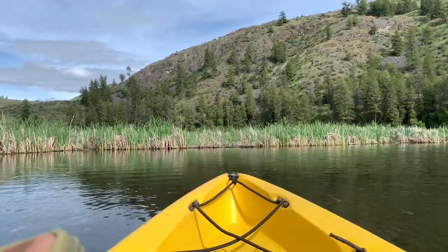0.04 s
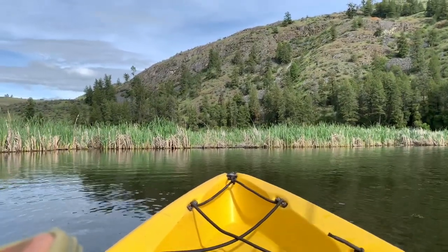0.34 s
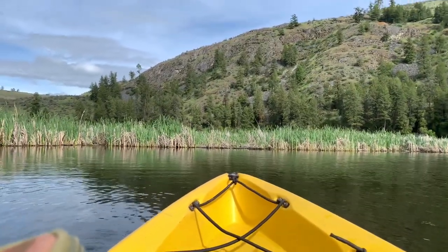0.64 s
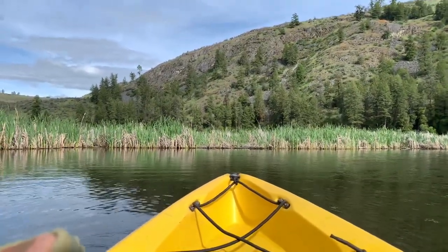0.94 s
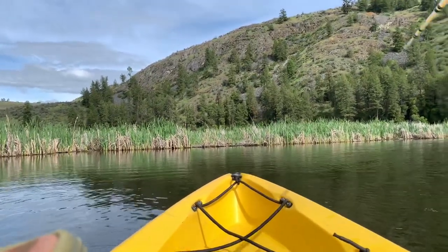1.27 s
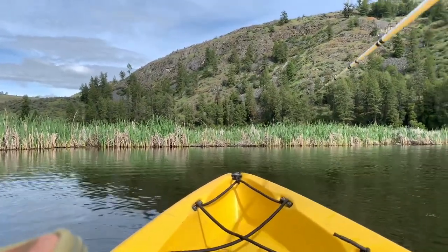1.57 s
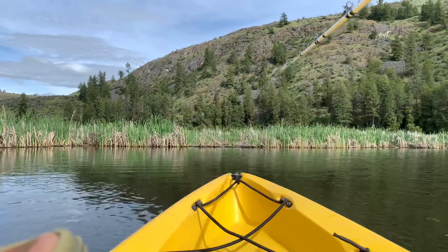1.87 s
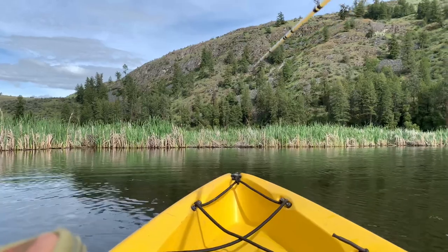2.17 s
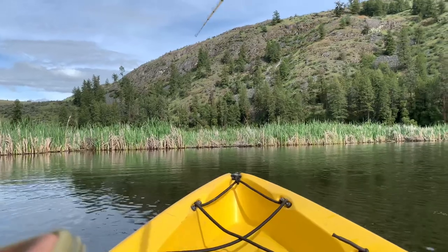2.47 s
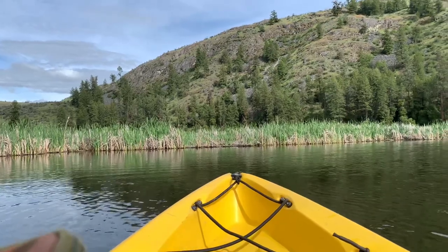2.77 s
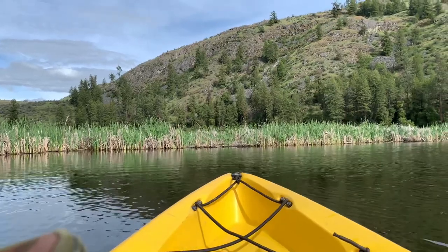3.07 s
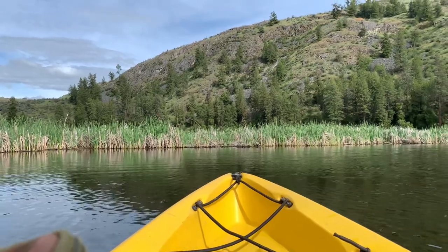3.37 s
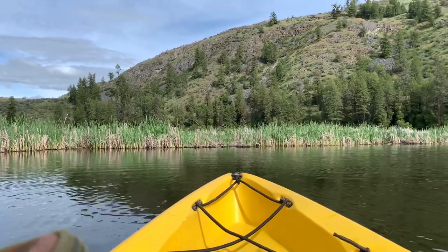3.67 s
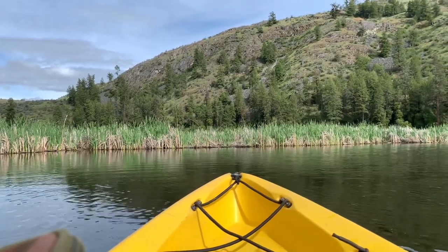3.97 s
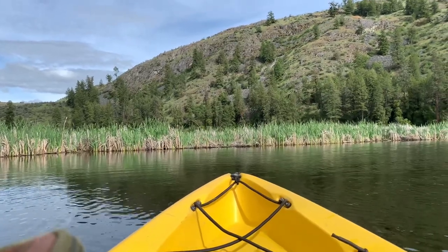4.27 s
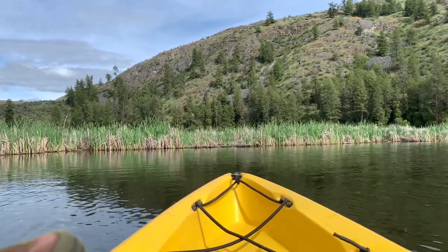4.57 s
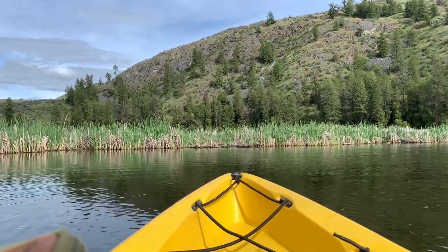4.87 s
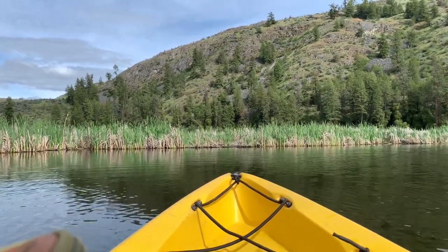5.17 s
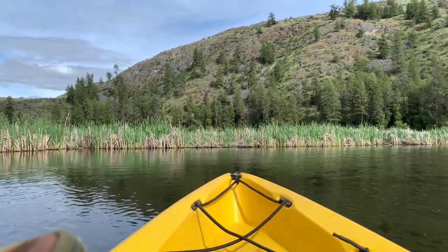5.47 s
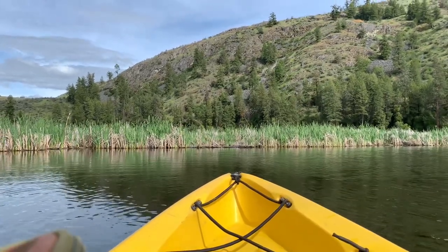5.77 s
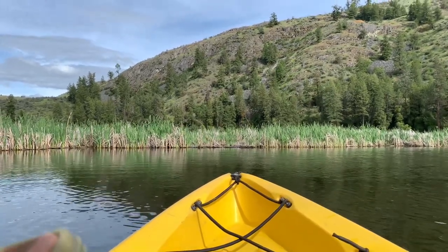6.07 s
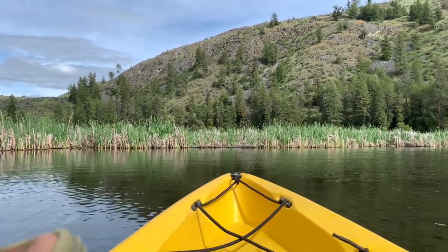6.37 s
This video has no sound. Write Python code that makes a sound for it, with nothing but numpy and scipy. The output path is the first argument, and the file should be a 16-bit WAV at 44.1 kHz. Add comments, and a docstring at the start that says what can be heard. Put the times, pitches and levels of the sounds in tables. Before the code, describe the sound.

Right at the start, a spinning reel's bail snaps open close by with a sharp metallic click. A sleeve rustles softly. At about 1 second, fishing line hisses off the spool, bright and fluttering, with a faint hum that sinks as it slows and thin high whistles from the rod rings. It stops just after 2 seconds. A few light taps follow, and at 2.8 seconds the bail snaps shut with another sharp click. The lake is then quiet, with faint high twittering and an occasional tiny plop by the kayak's hull. From about 4.7 seconds the birds grow busier, with raspy calls around 5.4, a blackbird's short buzzing trill from 5.5 to 6, and faint lower calls after it. Light wind rumbles unevenly on the microphone throughout, swelling around 2 seconds and again between 5 and 6.

```python
"""On a quiet lake, an angler casts from a kayak. The bail of a spinning reel snaps open, its impacts
ringing the reel's modes; line hisses off the spool by friction, in ever slower coils; the bail snaps shut.
Air pockets plop by the hull, small birds twitter and a blackbird sings a buzzing trill. A sleeve rustles,
and the turbulence of light gusts rumbles on the microphone."""
import sys
import numpy as np
from scipy import signal
from scipy.fft import rfft, irfft, next_fast_len
from scipy.io import wavfile
from scipy.ndimage import uniform_filter1d, map_coordinates

SR = 44100
rng = np.random.default_rng(int(sys.argv[2]) if len(sys.argv) > 2 else 0)


def dump(signal):
    """Clip the signal to [-1, 1] and save it as 16-bit WAV at the path in sys.argv[1]."""
    limited = np.clip(np.atleast_2d(signal).T, -1, 1)
    pcm = np.round(limited * 32767).astype(np.int16)
    wavfile.write(sys.argv[1], SR, pcm)


N = 284004
T = np.arange(N) / SR

# friction of the running line: time_s, level_db
PAYOUT_LEVEL = [(0.96, -67.5), (1.058, -43), (1.088, -46), (1.656, -47.5), (1.978, -59.5), (1.998, -55),
                (2.064, -67), (2.1, -66), (2.14, -54)]
LINE_STOP_S, LINE_BRAKING_S = 2.14, 0.035
def payout():
    """Friction needs motion: the line's gain lasts from the release until the lure lands."""
    level_db, = curves(PAYOUT_LEVEL)
    braking = np.clip((LINE_STOP_S - T) / LINE_BRAKING_S, 0, 1) ** 2
    return during(PAYOUT_LEVEL) * amp(level_db) * braking


# coils leaving the spool: time_s, rate_hz
COIL_RATE = [(1, 330), (1.22, 275), (1.36, 229), (1.44, 199), (1.53, 172), (1.57, 140), (1.63, 155),
             (1.76, 115), (1.9, 98)]
# line rubbing the spool lip: frequency_hz, gain_db
HISS_SPECTRUM = [(400, -14.5), (700, -12), (1200, -4), (1750, 3), (2700, 1.5), (3400, -3), (4200, -6.5),
                 (5100, 3.5), (6300, -2.5), (7700, -1), (9000, -11.5), (10500, -38), (12000, 1.5),
                 (15500, -22)]
# slack line slapping the rod: frequency_hz, gain_db
FLUTTER_SPECTRUM = [(120, 4), (250, -5), (360, -8), (550, 3), (800, -1.5), (1300, 6), (1900, -12)]
# left-right likeness of hiss and flutter: frequency_hz, correlation
LINE_CORRELATION = [(250, 1), (700, -0.096), (1700, -0.82), (2300, 0.38), (2900, 0.83), (3500, -0.24),
                    (4100, -0.67), (5000, 0.66), (6000, 0.51), (7600, 0.37), (8400, -0.23)]
# partials of the coil rate: harmonic, gain_db
HUM_HARMONICS = [(1, 6.5), (2, -15.5), (3, -28), (4, -2.5), (6, -10.5), (8, -5), (12, -1.5)]
# how the rod transmits the hum: frequency_hz, gain_db
ROD_RESPONSE = [(110, -41), (260, -17.5), (340, -26), (430, 7.5), (600, 5), (900, -4.5), (1150, -12.5),
                (1400, 6.5), (1650, -30), (2300, -12), (3500, 0)]
# swells of the hum: peak_s, half_width_s, gain_db
HUM_SWELLS = [(1.22, 0.092, -45.5), (1.375, 0.07, -45.5), (1.6, 0.1, -49), (1.8, 0.046, -65.5)]
FLUTTER_DB, FLUTTER_FADE_DB_PER_S = -2, 29
def line():
    """Periodic friction: each coil brushes the spool lip, so hiss pulses and hum sinks with the rate."""
    coil_hz, = curves(COIL_RATE)
    phase = turns(coil_hz * (1 + .015 * wobble(130)))
    brush = unit(amp(2 * np.cos(phase) + 1.3 * wobble(700) + wobble(70)))
    hiss = amp(1.5) * noise(HISS_SPECTRUM, LINE_CORRELATION)
    # comb filtering: each coil partly repeats the last, drawing falling streaks through the hiss
    hiss = hiss + .4 * np.array([np.interp(T - 1 / coil_hz, T, side) for side in hiss])
    flutter_db = FLUTTER_DB - FLUTTER_FADE_DB_PER_S * np.abs(T - COIL_RATE[0][0])  # the line straightens
    flutter = amp(flutter_db) * noise(FLUTTER_SPECTRUM, LINE_CORRELATION) * pan(-2.5)
    hum = 0
    for harmonic, db in HUM_HARMONICS:
        hz = harmonic * coil_hz
        spread = np.minimum(hz / 600, 1) * np.array([[0], [1.6]])  # low partials are more nearly in step
        waver_db = 2.5 * wobble(30)
        hum = hum + amp(db + along(ROD_RESPONSE, hz) + waver_db) * np.sin(harmonic * phase + spread)
    friction = payout() * brush * amp(0.97 * wobble(35.09)) * (hiss + flutter)
    return friction + swells(HUM_SWELLS) * amp(-6.5) * hum * pan(-8.5)


# line singing over the rings: start_s, length_s, first_hz, last_hz, level_db
RING_TONES = [(1.296, 0.15, 7900, 7600, -48), (1.412, 0.1, 7620, 7400, -40.5),
              (1.624, 0.083, 7450, 7300, -46.5), (1.86, 0.11, 14500, 12350, -53),
              (1.924, 0.065, 11000, 9530, -43), (1.973, 0.15, 10200, 9840, -49)]
# slack line dragging at release and landing: start_s, length_s, level_db
SLACK_DRAGS = [(.96, .19, -70), (1.852, 0.262, -56.5)]
def guides():
    """Sliding friction on the rod's rings gives a bright hiss and thin, narrow-band tones."""
    sing = np.zeros((2, N))
    for start, length, first_hz, last_hz, db in RING_TONES:
        progress = np.linspace(0, 1, int(length * SR))
        hz = first_hz + (last_hz - first_hz) * progress
        smear = np.clip(hz / 7000 - 1, .05, .6) * .07 * wobble(1500, len(hz))  # higher tones smear more
        add(sing, start, amp(db) * np.sin(np.pi * progress) * narrow(hz * (1 + smear), width_hz=970))
    drags = sum(amp(db) * held(start, length, edge=.04) for start, length, db in SLACK_DRAGS)
    contact = amp(-4) * payout() + drags
    flicker = amp(2 * wobble(150) + 2.4 * wobble(18))
    skim = noise([(7500, -44), (9200, -41), (10400, 4.5), (11300, 6), (12500, 0.5), (14000, 2.5),
                  (15500, -10.5)])
    return sing + contact * flicker * skim


# the bail meeting its latch: start_s, gain_db, crack_t60_s, rise_s, left_lead_ms
OPENING_CONTACTS = [(.0655, -37, 0.063, 0.0059, -0.05), (.074, -28, 0.046, 0.0016, -0.038),
                    (.0803, -11, 0.023, 0.00023, -0.24), (.0829, -13, 0.023, 0.00014, -0.51)]
# the bail falling on its stop: start_s, gain_db, crack_t60_s, rise_s, left_lead_ms
CLOSING_CONTACTS = [(2.758, -31, 0.055, .0003, .1), (2.7885, -15, .03, .005, .1),
                    (2.7946, -12, 0.021, .0002, 0.13)]
# modes of the latch: pitch_hz, base_width_hz, relative_db
LATCH_MODES = [(1710, 120, -6.5), (2393, 89, -9.5), (3339, 96, -3), (3820, 81, -4), (5270, 170, 2.5),
               (7000, 92, -11), (6620, 300, -4), (7200, 350, 4), (8150, 180, -6), (11080, 98, -11.5),
               (11700, 240, -17), (13250, 95, -16.5), (13400, 200, -14.5), (14700, 120, -18.5)]
# modes of the stop: pitch_hz, base_width_hz, relative_db
STOP_MODES = [(997, 12, -16), (2120, 140, -4.5), (2815, 210, -10.5), (3840, 80, -8.5), (5600, 33, -6.5),
              (5280, 70, -8), (6700, 47, -14.5), (7100, 300, -14), (8120, 100, -9), (10070, 510, -15.5),
              (10305, 220, -14), (12600, 90, -13), (13460, 130, -8), (12800, 60, 4.5)]
# crack of the latch: frequency_hz, gain_db
LATCH_SPECTRUM = [(240, -54.5), (400, -40), (1070, -10.5), (1380, -25), (1820, -9), (1990, -10), (3110, -5),
                  (3740, -5.5), (4490, -11.5), (7440, -5.5), (9070, -19), (14100, -17), (15500, -19.5)]
# crack of the stop: frequency_hz, gain_db
STOP_SPECTRUM = [(240, -47.5), (400, -26), (809, -25), (957, -17.5), (1190, -23.5), (2090, 0), (3510, -4.5),
                 (4160, -1.5), (7210, -8.5), (7910, -2.5), (10100, -16), (13100, -5), (15500, -14.5)]
# modes of the bail spring: pitch_hz, gain_db, t60_s
SPRING_MODES = [(587, -42, 0.29), (940, -28.5, 0.12), (1130, -39.5, .07), (4120, -33.5, 0.19)]
# modes of the bail wire: pitch_hz, gain_db, t60_s
WIRE_MODES = [(978, -31.5, .08), (2000, -34, 0.22), (4030, -38, .08)]
# knock in the rod handle: frequency_hz, gain_db
HANDLE_SPECTRUM = [(60, -35), (140, -16.5), (260, -6.5), (500, -4), (950, 0), (1800, 0.5), (4000, -11.5),
                   (15000, -36.5)]
def bail(contacts, reel_modes, crack_spectrum, steel_modes,
         crack_db, reel_db, damping, handle_db, handle_t60):
    """Impact excitation: each contact cracks, rings damped modes of reel and steel, knocks the handle."""
    out, size = np.zeros((2, N)), SR // 3
    t = np.arange(size) / SR
    gains = unit(amp([level for _, _, level in reel_modes])) / np.sqrt(len(reel_modes))
    for start, db, crack_t60, rise, lead_ms in contacts:
        reel = 0
        for gain, (hz, width_hz, _) in zip(gains, reel_modes):
            phase = 2 * np.pi * (hz * t + rng.random()) + rng.normal(0, .7, (2, 1))
            mode_t60 = np.log(1000) / (np.pi * width_hz * damping)  # a wider resonance dies sooner
            reel = reel + gain * np.sin(phase) * fade(t, mode_t60, rise)
        crack = noise(crack_spectrum, [(1000, 0.079), (3000, 0.45)], size) * fade(t, crack_t60, rise)
        steel = sum(amp(level) * np.sin(2 * np.pi * hz * t + np.array([[0], [1.5]])) * fade(t, t60)
                    for hz, level, t60 in steel_modes)
        handle = noise(HANDLE_SPECTRUM, [(250, 0.39), (700, -.4), (3000, 0.9)], size)
        handle *= fade(t, handle_t60, rise) * pan(-10.5)
        hit = amp(crack_db) * crack + amp(reel_db) * reel + steel + amp(handle_db) * handle
        advance_s = lead_ms / 1000 * np.array([[.5], [-.5]])
        add(out, start, amp(db) * filtered(hit, lambda hz: np.exp(2j * np.pi * hz * advance_s)))
    return out


# contacts of line, fingers and rod: start_s, tick_db, knock_db, knock_hz, t60_s
LIGHT_TAPS = [(0.347, -52.5, -85, 695, .0092), (0.874, -54.5, -66, 1410, .022),
              (1.019, -35.5, -48, 1530, .019), (1.06, -31, -43, 840, .0083), (1.067, -42, -56, 625, .04),
              (2.171, -57, -47.5, 370, .041), (2.256, -55, -58, 575, .04), (2.498, -46, -45.5, 913, 0.049),
              (2.66, -53.5, -59.5, 901, .02), (2.674, -52, -56, 554, .057), (2.729, -48, -56.5, 1516, .025),
              (3.497, -70, -67.5, 1394, .072), (4.29, -64.5, -53.5, 405, .0365),
              (5.505, -72, -60.5, 1450, .046), (5.669, -82, -65, 1570, 0.055)]
def taps():
    """Brief impacts have broad spectra: each gives a bright tick over a dull knock."""
    out, size = np.zeros((2, N)), SR // 5
    t = np.arange(size) / SR
    for start, tick_db, knock_db, hz, t60 in LIGHT_TAPS:
        tick = noise([(800, -17), (2500, 2.5), (5500, 0.5), (8000, -8.5), (15000, -14)], size=size)
        knock_spectrum = [(hz / 4, -18), (hz * 0.44, -2), (hz, 0), (hz * 2, -13), (hz * 6, -40)]
        knock = noise(knock_spectrum, [(300, 1), (900, 0)], size)
        add(out, start, (amp(tick_db) * tick + amp(knock_db) * knock * pan(-1)) * fade(t, t60))
    return out


# short high squeaks: start_s, squeak_db, flick_db
SQUEAKS = [(1.935, -71, -63), (2.063, -61.5, -55), (2.203, -68, -58.5)]
SQUEAK_S, SQUEAK_HZ, FLICK_AFTER_S, FLICK_S, FLICK_END_HZ = 0.053, 4175, .032, 0.016, 2900
def squeaks():
    """Frequency glide: three short squeaks near 4.2 kHz, each ending in a harsh downward flick."""
    out = np.zeros((2, N))
    for start, squeak_db, flick_db in SQUEAKS:
        squeak = note(SQUEAK_S, [SQUEAK_HZ, SQUEAK_HZ], rasp=.15)
        flick = note(FLICK_S, [SQUEAK_HZ, FLICK_END_HZ], rasp=0.98)
        add(out, start, amp(squeak_db) * squeak * pan(3.5))
        add(out, start + FLICK_AFTER_S, amp(flick_db) * flick * pan(1.6))
    return out


# partials of the blackbird's buzz: harmonic, gain_db
BUZZ_HARMONICS = [(6, -27), (7, 1), (8, -5.5), (9, -12.5), (10, -17.5), (11, -44), (12, -44)]
TRILL_START_S, TRILL_LENGTH_S, SYLLABLES_PER_S = 5.501, 0.559, 32.47
BUZZ_HZ, BUZZ_START_HZ, BUZZ_SETTLE_S = 393, 374, 0.065
def blackbird():
    """Amplitude modulation breaks a harmonic buzz into quick syllables, with a high pip in each gap."""
    t = np.maximum(T - TRILL_START_S, 0)
    buzz_hz = BUZZ_HZ + (BUZZ_START_HZ - BUZZ_HZ) * np.exp(-t / BUZZ_SETTLE_S)
    syllable = np.abs(np.sin(np.pi * SYLLABLES_PER_S * t))
    phase = turns(buzz_hz * (1 + 0.018 * (syllable - .75) + 0.00667 * wobble(270)))
    buzz = 0
    for harmonic, db in BUZZ_HARMONICS:
        arch = syllable ** (.7 + .3 * abs(harmonic - 7))  # upper partials open only at the crest
        buzz = buzz + amp(db + 1.5 * wobble(60)) * arch * np.sin(harmonic * phase + .4 * wobble(400))
    pip = amp(-10.5) * (1 - syllable) ** 2 * narrow(np.full(N, 5330.), width_hz=260) * pan(4.5)
    rasp_spectrum = [(1200, -60), (2100, -14), (2700, 0), (4000, -2), (5400, -3), (6200, -25),
                     (7500, -60)]
    rasp = amp(-11) * np.sqrt(syllable) * noise(rasp_spectrum)
    return held(TRILL_START_S, TRILL_LENGTH_S, edge=0.023) * amp(-58) * (amp(3) * buzz + pip + rasp)


# high songbird slurs: start_s, length_s, first_hz, middle_hz, last_hz, level_db, rasp_share
SONGBIRD_SLURS = [(0.316, 0.064, 5565, 5380, 4450, -72, 0.23), (.408, 0.021, 5530, 5020, 4400, -72, .05),
                  (0.677, .043, 4800, 5980, 4840, -72.5, .45), (2.447, 0.042, 3970, 4270, 5220, -65, .4),
                  (2.518, 0.051, 3980, 4470, 4800, -69, .6), (2.97, 0.054, 4120, 4700, 5450, -72.5, .55),
                  (3.129, 0.065, 5010, 4353, 4000, -77, .55), (3.353, .035, 5600, 6450, 6960, -79, 0.07),
                  (4.53, .066, 6950, 5800, 7430, -81, 0.22), (4.71, .046, 6950, 5790, 6980, -64.5, .05),
                  (4.743, 0.024, 6370, 6870, 6780, -71, 0.1), (4.821, .08, 4300, 4560, 5030, -78.5, 0.2),
                  (4.879, .05, 4640, 5880, 7270, -68.5, 0.2), (4.921, .11, 6720, 6090, 5130, -69.5, 0.85),
                  (5.029, 0.043, 4650, 5310, 7000, -71, 0.03), (5.15, 0.033, 7300, 5950, 5000, -69.5, .1),
                  (5.178, .04, 4940, 4700, 4170, -75, 0.7), (5.295, 0.024, 7080, 5590, 4630, -75, 0.1)]
# lower calls from the reeds: start_s, length_s, first_hz, last_hz, level_db, rasp_share
REED_CALLS = [(0.251, 0.027, 3320, 3140, -70, 0.3), (0.3, 0.038, 2600, 2430, -68.5, .05),
              (.392, 0.49, 3220, 3050, -74.5, 0.5), (0.559, 0.18, 3966, 3880, -71, 0.09),
              (0.779, .13, 1490, 1420, -79, .15), (3.89, 0.038, 1797, 2038, -76.5, 0.36),
              (4.763, 0.026, 1827, 2435, -69, 0.83), (5.118, 0.057, 2410, 2290, -68, 0.29),
              (5.155, .019, 2127, 1930, -56, 0.34), (5.157, 0.031, 1692, 1300, -70, .95),
              (5.363, 0.03, 2400, 2457, -60, 0.49), (5.403, .092, 3210, 2795, -52, .86),
              (5.481, 0.033, 2490, 2300, -54.5, 0.56), (5.786, .17, 1450, 1416, -70.5, 0.89),
              (5.97, .12, 1460, 1412, -66, .92), (6.058, 0.095, 1432, 1460, -65.5, 0.5)]
def birds():
    """Frequency modulation shapes birdsong: high slurs on the left, lower raspy calls ahead."""
    out = np.zeros((2, N))
    for calls, left_db in [(SONGBIRD_SLURS, 4), (REED_CALLS, -.8)]:
        for start, length, *pitches, db, rasp in calls:
            add(out, start, amp(db) * note(length, pitches, rasp) * pan(left_db))
    return out


# water by the hull: start_s, length_s, pitch_hz, level_db, left_over_right_db
HULL_PLOPS = [(0.424, 0.062, 820, -67, -12), (2.42, .027, 820, -66.5, -1), (3.692, 0.013, 746, -67.5, -2),
              (5.303, 0.026, 1001, -76, -20)]
def plops():
    """Cavity resonance: ripples close pockets of air against the hull, each a short sinking note."""
    out = np.zeros((2, N))
    for start, length, hz, db, left_db in HULL_PLOPS:
        add(out, start, amp(db) * note(length, [hz * 1.07, hz * .93], rasp=.3) * pan(left_db))
    return out


# birds far off in the reeds: time_s, level_db
CHORUS_LEVEL = [(0, -71.5), (2.2, -76.5), (2.8, -80.5), (3.8, -90.5), (4.6, -89.5), (5.3, -77), (6.44, -82)]
def chorus():
    """Incoherent summation blurs far birds into faint, flickering bands of noise."""
    level_db, = curves(CHORUS_LEVEL)
    bands = 0
    for hz, db in [(2400, -3.5), (3150, -4), (4350, 1.5), (5200, -2.5)]:
        flicker = amp(db + 5 * wobble(30))
        bands = bands + flicker * narrow(hz * (1 + .03 * wobble(70)), width_hz=550)
    return amp(level_db) * unit(bands)


TWITTER_PER_S, TWITTER_HZ, TWITTER_S = 3, 4600, .04
def twitter():
    """A random point process: stray slurs vary in time, pitch and place, and follow the far chorus."""
    out = np.zeros((2, N))
    level_db, = curves(CHORUS_LEVEL)
    for when, *chance in rng.random((int(TWITTER_PER_S * N / SR), 6)):
        height, side, *bends = 2 * np.array(chance) - 1
        pitches = TWITTER_HZ * np.exp(.18 * height + .12 * np.array(bends))
        slur = note(TWITTER_S, pitches, rasp=.45) * pan(7 * side)
        add(out, when * N / SR, amp(level_db[int(when * N)] - 2.5) * slur)
    return out


# moves of the angler's arm: peak_s, rise_s, fall_s, level_db
SLEEVE_STROKES = [(.16, .03, 0.055, -61), (.45, .3, 0.55, -68.5), (.93, 0.13, 0.7, -62),
                  (2.489, .06, .15, -68.5), (2.78, 0.12, 0.13, -55), (3.49, 0.15, 0.16, -76),
                  (4.329, 0.055, .05, -60), (5.49, 0.099, 0.074, -69)]
# rubbing cloth: frequency_hz, gain_db
CLOTH_SPECTRUM = [(200, -8), (700, -1.5), (1200, -5.5), (2500, 4), (5500, 1), (7500, -5), (10000, -10.5),
                  (12000, -14), (15500, -17)]
STROKE_DEPTH_DB = 20  # covered within each rise and each fall
def sleeve():
    """Stick-slip friction: cloth rubs in small uneven slips, swelling with each move of the arm."""
    strokes = sum(amp(db - STROKE_DEPTH_DB * np.maximum((peak - T) / rise, (T - peak) / fall))
                  for peak, rise, fall, db in SLEEVE_STROKES)
    return strokes * amp(0.6 * wobble(120)) * noise(CLOTH_SPECTRUM)


# gusts at the microphone: time_s, strength_db
GUSTS = [(0.0, -72), (0.11, -47), (0.27, -75.5), (0.36, -54), (0.63, -60), (0.99, -47.5), (1.02, -53.5),
         (1.72, -64), (1.99, -38.5), (2.15, -52.5), (2.24, -38), (2.26, -49), (2.73, -59), (2.87, -49.5),
         (3.01, -75.5), (3.07, -56.5), (3.35, -67), (3.57, -52), (3.64, -60.5), (4.21, -47.5), (4.59, -49),
         (4.68, -64), (5.13, -37), (5.33, -53.5), (5.5, -37), (5.58, -46), (5.67, -35.5), (5.79, -57),
         (5.88, -33.5), (6.31, -70.5), (6.39, -53.5), (6.44, -52)]
# slow eddies: frequency_hz, gain_db
RUMBLE_SPECTRUM = [(15, -44.5), (25, -20), (33, -9), (42, 2.5), (52, 4.5), (66, 2), (81, 3), (113, -11.5),
                   (160, -30.5), (260, -52), (700, -120)]
# quicker buffets: frequency_hz, gain_db
BUFFET_SPECTRUM = [(70, -22.5), (115, 7.5), (160, 0.5), (220, -13.5), (330, -32), (600, -65), (1500, -120)]
# single thumps of air: peak_s, half_width_s, level_db
AIR_THUMPS = [(.94, .08, -59), (1.06, 0.019, -45.5), (2.01, 0.017, -47.5), (2.224, 0.0064, -43.5),
              (5.27, 0.044, -54.5), (5.545, 0.017, -40.5), (5.87, 0.018, -40.5), (6.0, .06, -47)]
BUFFET_DB, BUFFET_AT_STRENGTH_DB, BUFFET_DB_PER_DB = -66.5, -44, 1.1
def wind():
    """Turbulent pressure: eddies push on the microphone, and stronger gusts break into buffets."""
    strength_db, = curves(GUSTS)
    rumble = amp(strength_db + wobble(11)) * noise(RUMBLE_SPECTRUM, [(60, 1), (150, 1)])
    buffet_db = BUFFET_DB + BUFFET_DB_PER_DB * (strength_db - BUFFET_AT_STRENGTH_DB)
    buffet = amp(buffet_db + 4.9 * wobble(18)) * noise(BUFFET_SPECTRUM, [(120, 0.96), (400, 1)])
    thumps = swells(AIR_THUMPS) * noise(BUFFET_SPECTRUM, [(120, .55)])
    return rumble + buffet + thumps


# decay of the shore's reflections: frequency_hz, t60_s
SHORE_DECAY = [(300, .35), (2500, .27), (6000, 0.33), (12000, 0.16)]
def shore(x):
    """Diffuse reflection: reeds and hillside scatter a soft tail back across the water."""
    hz, t, spectra = signal.stft(rng.standard_normal((2, SR // 2)), SR, nperseg=256)
    decay = np.exp(-np.log(1000) * t / along(SHORE_DECAY, hz)[:, None])
    _, tail = signal.istft(spectra * decay, SR, nperseg=256)
    return signal.fftconvolve(x, tail / np.linalg.norm(tail[0]), axes=1)[:, :N]


# still air over the water: frequency_hz, gain_db
LAKE_SPECTRUM = [(120, -31.5), (200, -4), (1130, -13), (2250, -14), (3010, -16.5), (5110, -17.5),
                 (8350, -21), (9310, -37), (11400, -18), (13900, -21.5), (15500, -30.5)]
def lake():
    """A diffuse field of air and reeds: a faint wash, alike on both sides only at long wavelengths."""
    return amp(-79 + 0.38 * wobble(2.2)) * noise(LAKE_SPECTRUM, [(150, 0.99), (600, .05), (8000, 0.044)])


def note(length, pitches, rasp):
    """A soft-edged tone gliding through its pitches; rasp is the share of power in a noise band."""
    progress = np.linspace(0, 1, int(length * SR))
    glide = np.polyfit(np.linspace(0, 1, len(pitches)), pitches, len(pitches) - 1)
    hz = np.polyval(glide, progress)
    tone = np.sqrt(2) * np.sin(turns(hz) + np.array([[0], [.9]])) * amp(0.54 * wobble(150, len(hz)))
    voice = np.sqrt(1 - rasp) * tone + np.sqrt(rasp) * narrow(hz, 200 + 700 * rasp)
    return np.abs(np.sin(np.pi * progress)) ** 1.9 * voice


def noise(spectrum, correlation=((1000, 0),), size=N):
    """Coloured stereo noise of rms 1; the balance of mid and side sets the left-right correlation."""
    def response(hz):
        angle = np.arccos(np.clip(along(correlation, hz), -1, 1)) / 2
        return amp(along(spectrum, hz)) * [np.cos(angle), np.sin(angle)]
    mid, side = filtered(rng.standard_normal((2, size)), response)
    return unit(np.array([mid + side, mid - side]))


def narrow(hz, width_hz):
    """Random quadrature modulation: a stereo noise band of rms 1 around a moving frequency."""
    phase, size = turns(hz), len(hz)
    return unit(np.array([wobble(width_hz, size) * np.cos(phase) + wobble(width_hz, size) * np.sin(phase)
                          for _ in range(2)]))


def filtered(x, response):
    """Linear filtering: the spectrum of x times a frequency response."""
    size = x.shape[-1]
    padded = next_fast_len(size + 8192)
    return irfft(rfft(x, padded) * response(np.fft.rfftfreq(padded, 1 / SR)), padded)[..., :size]


def fade(t, t60, rise=0.000097):
    """A quick rise and an exponential decay."""
    return np.exp(-np.log(1000) * t / t60) * (1 - np.exp(-t / rise))


def held(start, length, edge):
    """A trapezoidal envelope with equal edges."""
    return np.clip(np.minimum(T - start, start + length - T) / edge, 0, 1)


def swells(rows):
    """A sum of Gaussian envelopes."""
    return sum(amp(db) * np.exp(-((T - peak) / half_width) ** 2) for peak, half_width, db in rows)


def during(rows):
    """A soft-edged gate over the time span of a table."""
    return uniform_filter1d(1. * ((T > rows[0][0]) & (T < rows[-1][0])), size=400)


def curves(rows):
    """One value per sample for each column after the time."""
    times, *columns = np.transpose(rows)
    return [np.interp(T, times, column) for column in columns]


def along(points, hz):
    """Interpolation of (frequency_hz, value) points on a log axis."""
    frequencies, values = np.transpose(points)
    return np.interp(np.log(hz + 1), np.log(frequencies + 1), values)


def wobble(rate, size=N):
    """A smooth random curve, rate knots a second."""
    knots = rng.standard_normal(int(size * rate / SR) + 4)
    return map_coordinates(knots, [np.arange(size) * rate / SR])


def turns(hz):
    """Phase as the integral of frequency."""
    return 2 * np.pi * np.cumsum(hz) / SR


def amp(db):
    """Decibels to gain."""
    return 10 ** (np.asarray(db) / 20)


def unit(x):
    """x at rms 1."""
    return x / np.sqrt(np.mean(x ** 2) + 1e-20)


def pan(db):
    """Left and right gains for a level difference."""
    return amp([[db / 2], [-db / 2]])


def add(track, start, sound):
    """Superpose a sound on the track from start seconds."""
    part = track[:, max(round(start * SR), 0):][:, :sound.shape[-1]]
    part += sound[..., :part.shape[1]]


def scene():
    """Superposition: tackle close by, birds in the reeds, the shore's reflections, wind over all."""
    opening = bail(OPENING_CONTACTS, LATCH_MODES, LATCH_SPECTRUM, SPRING_MODES,
                   crack_db=-4.5, reel_db=5.5, damping=1.4, handle_db=-33, handle_t60=0.13)
    closing = bail(CLOSING_CONTACTS, STOP_MODES, STOP_SPECTRUM, WIRE_MODES,
                   crack_db=3, reel_db=5, damping=3.4, handle_db=-21.5, handle_t60=.05)
    tackle = opening + closing + taps() + line() + guides()
    around = birds() + squeaks() + twitter() + blackbird() + plops()
    reflections = shore(amp(-40.5) * tackle + amp(-5.5) * around)
    return tackle + around + reflections + chorus() + sleeve() + lake() + wind()


# stereo width of the treble: frequency_hz, mid_db, side_db
TREBLE_WIDTH = [(8550, 0, 0.5), (9120, -4.5, 7.5), (9400, -30.5, 7.5), (9320, -33.5, 4), (10450, -2, 6),
                (11400, -1.5, 2), (12100, 0.5, -23), (14400, 4, -22), (15000, -3.5, 3.5)]
BAND_LIMIT_HZ = 15850
def record(dry):
    """Mid-side filtering: treble out of phase near 9.5 kHz, centred at 12-14 kHz, silent above 16 kHz."""
    frequencies, *gains_db = np.transpose(TREBLE_WIDTH)
    mid_side = np.array([dry[0] + dry[1], dry[0] - dry[1]]) / 2
    mid, side = filtered(mid_side, lambda hz: amp([np.interp(hz, frequencies, db) for db in gains_db]))
    left_right = np.array([mid + side, mid - side])
    return filtered(left_right, lambda hz: .5 - .5 * np.tanh((hz - BAND_LIMIT_HZ) / 120))


dry = scene()
out = record(dry)
dump(out)
```